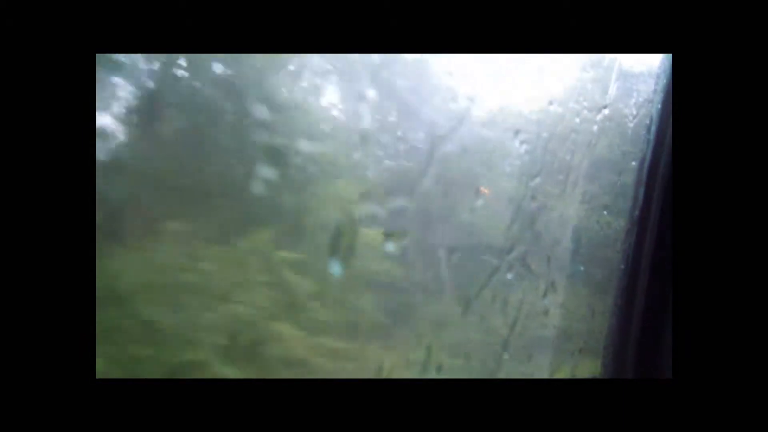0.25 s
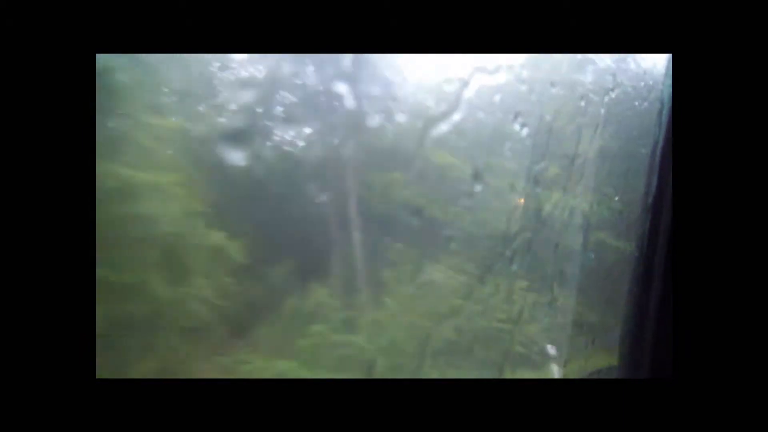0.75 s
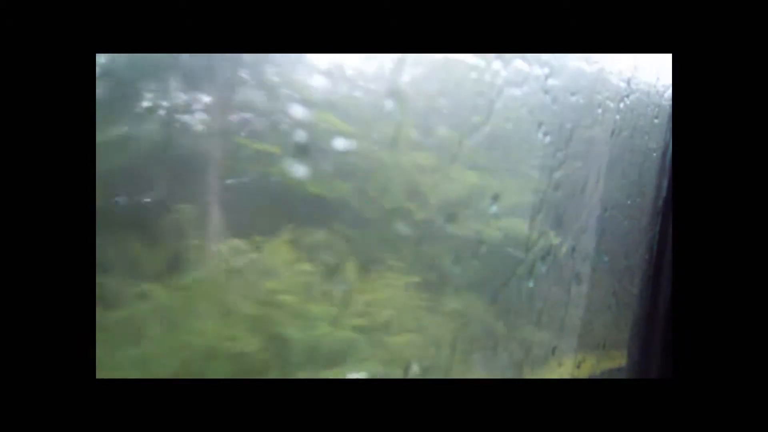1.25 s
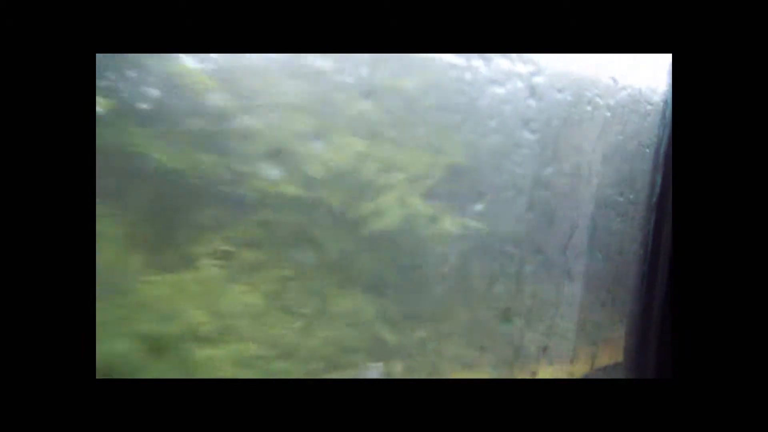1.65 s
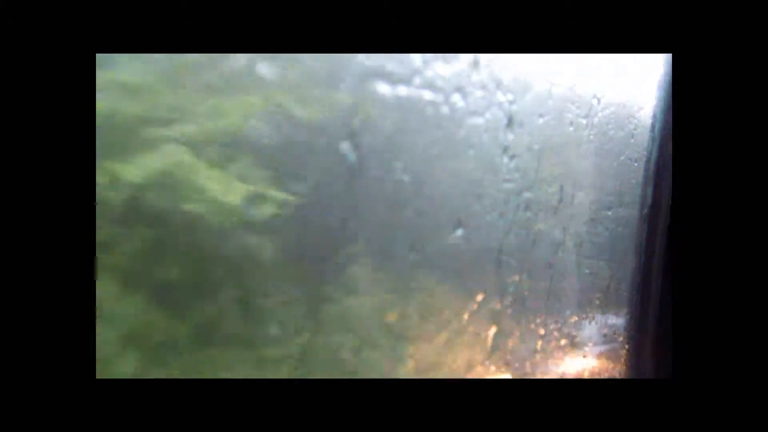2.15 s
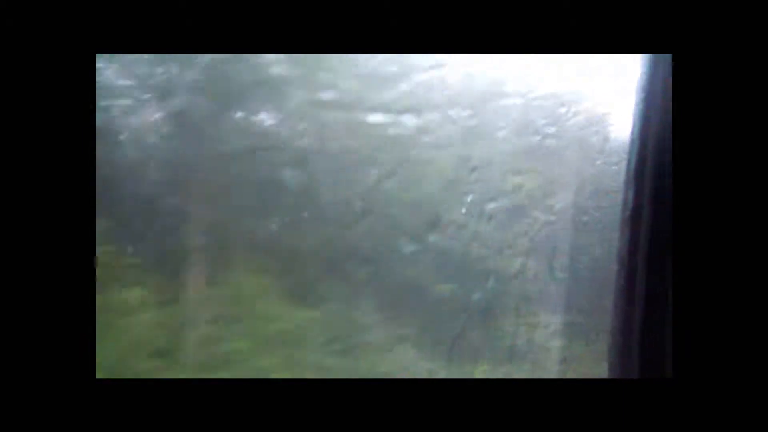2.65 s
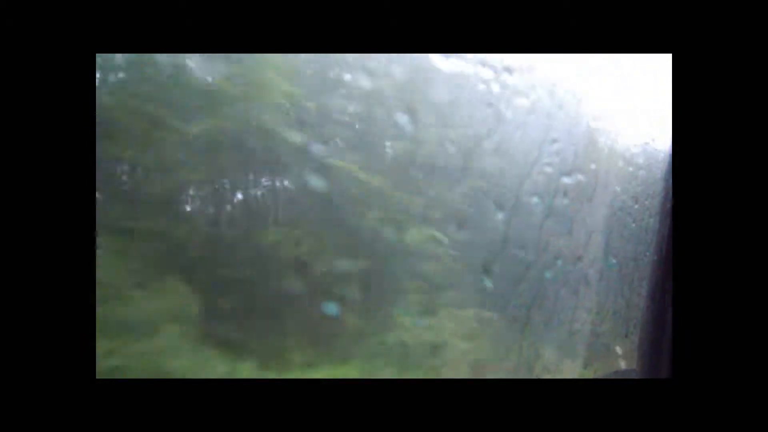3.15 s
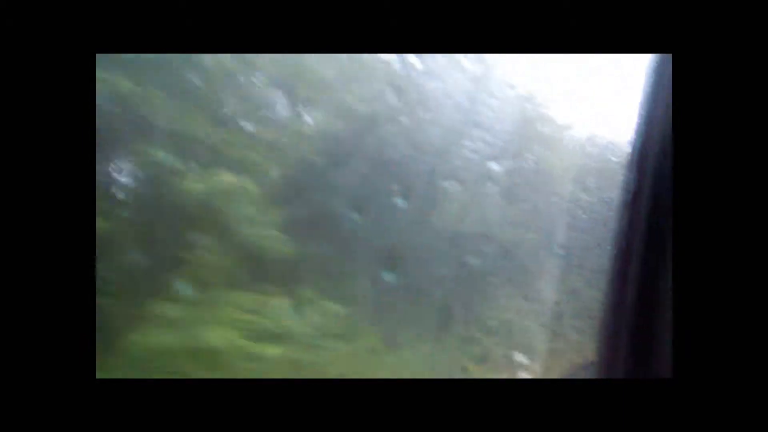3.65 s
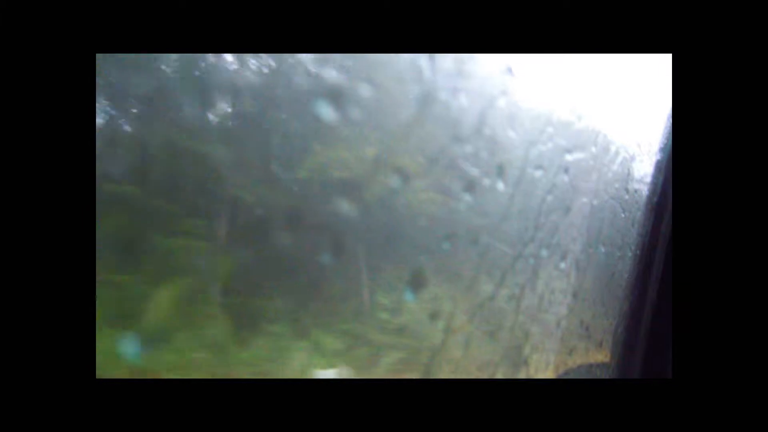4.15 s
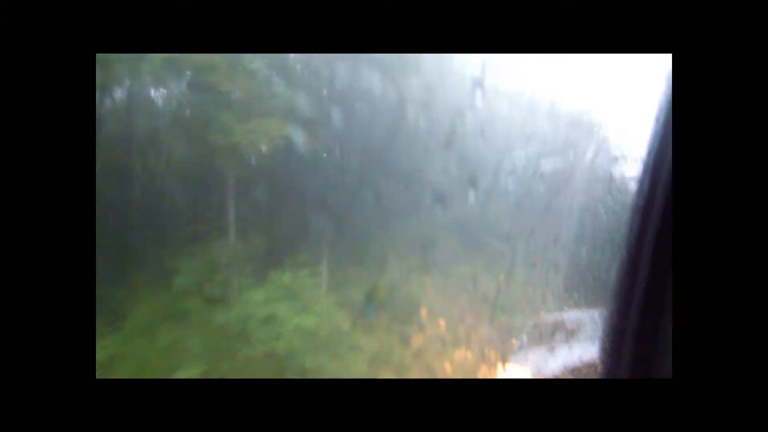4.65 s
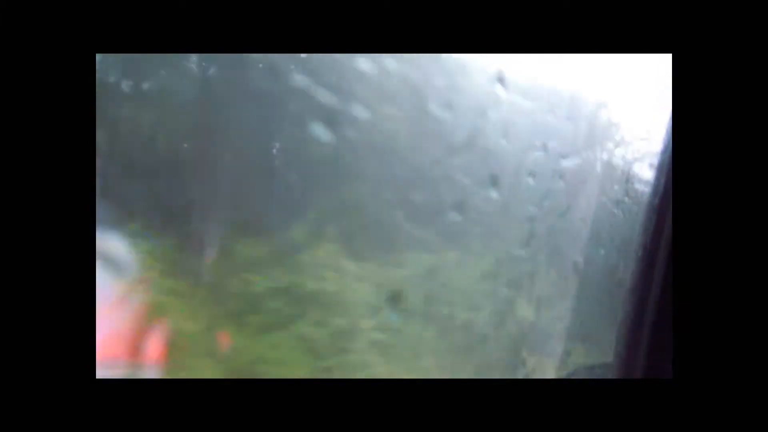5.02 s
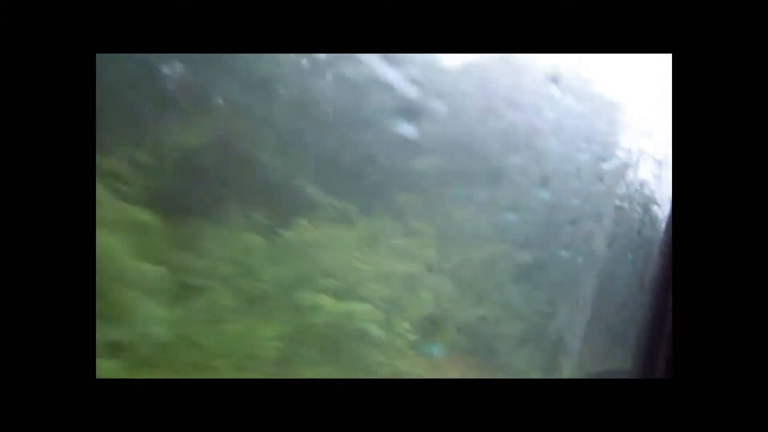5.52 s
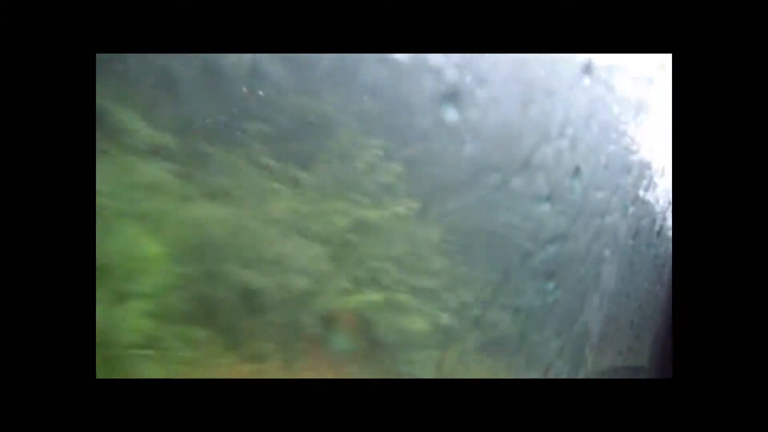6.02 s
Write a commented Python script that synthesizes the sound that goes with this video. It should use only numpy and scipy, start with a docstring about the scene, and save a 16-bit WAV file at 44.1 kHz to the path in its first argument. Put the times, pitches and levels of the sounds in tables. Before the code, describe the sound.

Rain patters and fat drops smack the glass of a driving car, while the engine drones and tyres rumble on wet road.

```python
"""Inside a car, driving through a forest in heavy rain.
The engine booms at its firing rate and the drivetrain whines faintly. The body shakes over bumps;
the tyres rumble, roar and hiss on the wet road and wash through puddles.
Rain patters on glass and roof in gusts, and fat drops from the trees smack in between."""
import sys
import numpy as np
from scipy import signal
from scipy.fft import rfft, irfft
from scipy.io import wavfile

SR = 44100
rng = np.random.default_rng(int(sys.argv[2]) if len(sys.argv) > 2 else 0)


def generate_wav(signal):
    """Clip the signal to [-1, 1] and save it as 16-bit WAV at the path in sys.argv[1]."""
    frames = np.transpose(np.atleast_2d(signal))
    scaled = np.clip(frames, -1, 1) * 32767
    pcm = np.round(scaled).astype(np.int16)
    wavfile.write(sys.argv[1], SR, pcm)


N = 276948
TIME = np.arange(N) / SR
CABIN_T60_S = .04


def from_db(db):
    """Decibels to gain."""
    return 10 ** (np.asarray(db) / 20)


def unit_rms(x):
    """Scale to rms 1."""
    return x / np.sqrt(np.mean(x ** 2) + 1e-20)


def curves(rows):
    """One linearly interpolated curve per column after t."""
    times, *columns = np.transpose(rows)
    return [np.interp(TIME, times, column) for column in columns]


def swell(at_s, half_s):
    """Gaussian of height 1, down to 1/e at +-half_s."""
    return np.exp(-((TIME - at_s) / half_s) ** 2)


def drift(rate_hz):
    """Slow random wander, rms 1."""
    hop, settle = 40, 2000
    pole = np.exp(-2 * np.pi * rate_hz * hop / SR)
    noise = rng.standard_normal(N // hop + settle + 2)
    slow = signal.lfilter([1], [1, -2 * pole, pole ** 2], noise)[settle:]
    return np.interp(np.arange(N) / hop, np.arange(len(slow)), unit_rms(slow))


def coloured(x, spectrum):
    """Minimum-phase filter, falling 24 dB/oct past the spectrum's ends; output rms 1."""
    hz, db = np.transpose(spectrum)
    size = 2 ** 15
    bin_oct = np.log2(np.maximum(np.arange(size // 2 + 1) * SR / size, 1))
    knot_oct = np.log2(hz)
    outside_oct = np.abs(bin_oct - np.clip(bin_oct, knot_oct[0], knot_oct[-1]))
    shape_db = np.interp(bin_oct, knot_oct, db) - 24 * outside_oct
    cepstrum = irfft(np.log(from_db(shape_db)))[:size // 2]
    cepstrum[0] /= 2
    impulse = irfft(np.exp(rfft(2 * cepstrum, size)))
    return unit_rms(signal.fftconvolve(x, impulse)[:N])


def band(x, hz, width_oct, order=1):
    """Butterworth band-pass centred on hz."""
    edges_hz = np.clip(hz * 2 ** (np.array([-.5, .5]) * max(width_oct, .1)), [100, 200], [15000, 19000])
    return signal.sosfilt(signal.butter(order, edges_hz, "band", fs=SR, output="sos"), x + 1e-18)


def noise_band(hz, width_oct):
    """Band of noise, rms 1."""
    return unit_rms(band(rng.standard_normal(N), hz, width_oct, order=2))


# firing rate: t/s, f/Hz
FIRING_RATE = [(0, 69.1), (.6, 67.7), (1, 67.1), (1.6, 67.03), (2.6, 67.45), (3.6, 67.7), (4.6, 68.1),
               (5.1, 68.5), (6.28, 68.75)]
# engine load: t/s, order 1 level/dB, order 2 level/dB
ENGINE_LOAD = [(0.0, -33.5, -37.5), (0.45, -29.0, -33), (0.79, -29.5, -36), (0.92, -23.5, -33.5),
               (1.6, -23, -31.0), (2.1, -27, -33), (2.8, -25.5, -32.5), (4.0, -26.5, -31),
               (4.6, -24.0, -30.0), (5.2, -29, -34), (6.28, -26.5, -34)]
# weak orders: multiple of firing rate, level/dB re order 2
WEAK_ORDERS = [(2.5, -20), (3.5, -19.5), (4, -25.5), (5, -26.5)]
# third-order drone: t/s, level/dB
DRONE_LEVEL = [(0.0, -47.5), (0.75, -40), (1.5, -47), (2.6, -50.5), (6.28, -53)]
# drivetrain whine: t/s, level/dB
WHINE_LEVEL = [(0.0, -47.5), (0.49, -41), (0.98, -46.5), (2.6, -48.5), (4.45, -45.5), (5.04, -50),
               (5.4, -48), (6.28, -62)]


def engine():
    """Firing pulses reach the cabin as a boom and higher orders; the drivetrain whine turns with them."""
    firing_hz, = curves(FIRING_RATE)
    boom_db, octave_db = curves(ENGINE_LOAD)
    drone_db, = curves(DRONE_LEVEL)
    whine_db, = curves(WHINE_LEVEL)
    phase = 2 * np.pi * np.cumsum(firing_hz) / SR

    def tone(order, db, waver):
        """One order, unsteady in amplitude and phase."""
        amplitude = np.sqrt(2) * from_db(db) * (1 + waver * drift(8.3))
        return amplitude * np.cos(order * phase + waver * drift(2.3))

    boom = tone(1, boom_db, waver=.1) + tone(2, octave_db, waver=.17)
    overtones = sum(tone(order, octave_db + db, waver=.24) for order, db in WEAK_ORDERS)
    drone = tone(3, drone_db, waver=.33)
    whine = tone(6, whine_db, waver=.18)
    return boom + overtones + drone + whine


# road bumps: t/s, peak level/dB, half-width/s
ROAD_BUMPS = [(0.62, -24.5, .07), (2.806, -24, 0.22), (3.64, -24, 0.044), (4.505, -26, 0.14),
              (4.882, -18.5, 0.15), (6.05, -20.5, .13)]
# body shake: f/Hz, relative level/dB
SHAKE_SPECTRUM = [(8, 4.5), (14, -11), (20, 1), (30, -0.5), (42, -15.5), (55, -7), (80, -23.5)]


def body_shake(floor_db=-28.5):
    """The body rocks on its springs, harder over bumps."""
    bump_power = sum((from_db(db) * swell(at_s, half_s)) ** 2 for at_s, db, half_s in ROAD_BUMPS)
    return np.sqrt(from_db(floor_db) ** 2 + bump_power) * coloured(rng.standard_normal(N), SHAKE_SPECTRUM)


# road surface: t/s, rumble level/dB, hiss level/dB, roar level/dB
ROAD_SURFACE = [(0.0, -34.5, -46.5, -78), (0.6, -32.5, -43.5, -72), (1.45, -32, -42.5, -59),
                (1.8, -32.5, -43.5, -46.5), (2.25, -35.5, -45.5, -44), (3.0, -34, -45, -47),
                (3.35, -33, -43.5, -44.5), (3.85, -33, -43.5, -44), (4.6, -31, -40, -41.3),
                (5.1, -35.5, -45, -48), (5.6, -36, -43.5, -50.5), (5.92, -33, -41, -44),
                (6.28, -33, -41.5, -46)]
# tyre rumble: f/Hz, relative level/dB
RUMBLE_SPECTRUM = [(35, -16), (60, 4), (92, 7), (120, 1), (185, 0), (240, -2.5), (315, -6), (375, -5.5),
                   (470, -13), (620, -17), (1000, -30)]
# wet hiss: f/Hz, relative level/dB
HISS_SPECTRUM = [(350, -8), (520, -6.5), (640, 1), (760, -3), (900, -3.5), (1040, -5.5), (1140, -1.5),
                 (1260, -7), (1420, -6), (1600, -16.5), (2000, -17.5), (3000, -19)]


def tyres():
    """The tread drums on asphalt, squeezes out water and roars in one broad resonance."""
    rumble_db, hiss_db, roar_db = curves(ROAD_SURFACE)
    rumble = from_db(rumble_db) * coloured(rng.standard_normal(N), RUMBLE_SPECTRUM)
    hiss = from_db(hiss_db + 1.3 * drift(3.3)) * coloured(rng.standard_normal(N), HISS_SPECTRUM)
    roar = from_db(roar_db) * noise_band(hz=772, width_oct=.4)
    return rumble + hiss + roar


# oncoming cars: t/s, peak level/dB, half-width/s
ONCOMING_CARS = [(2.803, -51.5, 0.19), (4.96, -49, 0.27)]
# puddles: t/s, peak level/dB, half-width/s
PUDDLE_CROSSINGS = [(5.905, -48.5, 0.11), (6.153, -45, 0.056)]


def road_water():
    """Water sizzles thinly as oncoming cars pass; the wheels wash through puddles."""
    passing = sum(from_db(db) * swell(at_s, half_s) for at_s, db, half_s in ONCOMING_CARS)
    wading = sum(from_db(db) * swell(at_s, half_s) for at_s, db, half_s in PUDDLE_CROSSINGS)
    return passing * noise_band(hz=4400, width_oct=.24) + wading * noise_band(hz=1690, width_oct=.73)


def impacts(per_s, cap_db, low_hz, high_hz, width_oct, spots=12):
    """Drops land at random, many small, few large; each spot rings briefly in its own band."""
    size_db = np.minimum(3 * rng.exponential(1, N), cap_db)
    clicks = from_db(size_db) * rng.choice([-1, 1], N) * (rng.random(N) < per_s / SR)
    spot = rng.integers(0, spots, N)
    spot_hz = np.geomspace(low_hz, high_hz, spots)
    return unit_rms(sum(band(clicks * (spot == k), hz, width_oct) for k, hz in enumerate(spot_hz)))


def cabin_scatter(x, tail_db):
    """Glass and trim scatter each impact into a short diffuse tail."""
    pole = from_db(-60 / (CABIN_T60_S * SR)) ** 2
    energy = signal.lfilter([1 - pole], [1, -pole], x ** 2 + 1e-18)
    return x + from_db(tail_db) * np.sqrt(energy) * rng.standard_normal(N)


# rain strength before trim: t/s, patter level/dB, spray level/dB
RAIN_STRENGTH = [(0.0, -45.5, -45), (0.12, -42.5, -43.5), (0.75, -44.5, -45), (0.88, -44.5, -44.5),
                 (0.97, -44, -44.5), (1.6, -41.5, -42), (2.22, -49.5, -51.5), (2.42, -47.5, -47.5),
                 (2.95, -47.5, -46.5), (3.25, -46.5, -46), (3.8, -44.5, -45), (4.55, -44.5, -46.5),
                 (5.15, -45.5, -48), (5.55, -45.5, -47.5), (5.85, -41.5, -42.5), (6.28, -43, -50)]
# water shaken from trees: t/s, spray rise/dB, half-width/s
TREE_SHOWERS = [(0.11, 3, 0.043), (0.965, 7.5, 0.025), (1.102, 6.5, 0.047), (1.305, 2, 0.018),
                (1.512, 4.5, 0.025), (2.05, 4.5, 0.053), (2.443, 2.5, 0.082), (3.03, 4.5, 0.011),
                (3.32, 2.5, 0.015), (3.988, 3, 0.05), (4.246, 5, 0.035), (4.5, 5.5, 0.026),
                (4.634, 4, 0.074), (5.738, 4.5, 0.031)]
# patter: f/Hz, relative level/dB
PATTER_SPECTRUM = [(600, -4.5), (1200, -3.5), (1720, 0.5), (2050, -2), (2600, 1), (2880, 1.5), (3250, 2.5),
                   (4300, 0.5), (5500, -3), (7500, -5), (10500, -38)]
# fine spray: f/Hz, relative level/dB
SPRAY_SPECTRUM = [(3000, -16), (5000, -5), (6500, -3), (8000, -1), (9300, -1.5), (10200, -6), (11000, -9.5)]


def rain(patter_trim_db=1.48, spray_trim_db=1.33):
    """Drops patter on the panes, spray ticks on the windscreen, in flurries over a wash of droplets."""
    patter_db, spray_db = curves(RAIN_STRENGTH)
    showers_db = sum(db * swell(at_s, half_s) for at_s, db, half_s in TREE_SHOWERS)
    surge_db = showers_db + drift(4)
    flurry = drift(35)
    drops = impacts(1500 * from_db(3.6 * flurry), cap_db=15, low_hz=935, high_hz=7000, width_oct=1.5)
    ticks = impacts(1600 * from_db(4.4 * flurry), cap_db=17, low_hz=4500, high_hz=9850, width_oct=.48)
    drops = cabin_scatter(drops, tail_db=-2)
    ticks = cabin_scatter(ticks, tail_db=-3)
    patter = coloured(drops + from_db(1) * rng.standard_normal(N), PATTER_SPECTRUM)
    spray = coloured(ticks + from_db(-3) * rng.standard_normal(N), SPRAY_SPECTRUM)
    patter *= from_db(patter_db + .46 * surge_db + patter_trim_db)  # showers are mostly spray
    spray *= from_db(spray_db + surge_db + spray_trim_db)
    return patter + spray


def stray_drops(per_s=9, count=120, width_oct=.94, splash_s=.0034):
    """Middling drops at random, harder in heavier rain; rows as in FAT_DROPS."""
    times = np.cumsum(rng.gamma(2, .5, count)) / per_s
    size, pitch = rng.standard_normal((2, count))
    _, spray_db = curves(RAIN_STRENGTH)
    swing_db = np.interp(times, TIME, spray_db - spray_db.mean())
    levels_db = -37 + .9 * size + .33 * swing_db
    pings_hz = 6600 * 2 ** (.41 * pitch)
    return [(at_s, db, hz, width_oct, splash_s)
            for at_s, db, hz in zip(times, levels_db, pings_hz) if at_s < TIME[-1]]


# fat drops from trees: t/s, level/dB before trim, ping f/Hz, ping width/oct, splash decay/s
FAT_DROPS = [(0.113, -35, 4400, 1.1, .004), (0.2312, -32.5, 3680, 1, 0.0021),
             (0.32, -30.5, 4500, 1.6, 0.002), (0.369, -32, 4300, 1.6, 0.0016),
             (0.4649, -33.5, 3600, 1.1, 0.0025), (0.5078, -38, 7500, 1, .0016),
             (0.5402, -24.5, 5000, 1.7, 0.0021), (0.5645, -27, 6300, 1.9, 0.0049),
             (0.6469, -36, 8000, 0.74, .0016), (0.667, -29, 5500, 2.4, 0.0045),
             (0.706, -27, 7400, 1.7, 0.0075), (0.7982, -29.5, 7000, 1, 0.0019),
             (0.8188, -25, 3920, 1, 0.003), (0.967, -31, 7000, 1.5, .0044),
             (1.0698, -27.5, 3800, 2.3, 0.005), (1.2071, -29.5, 8100, .66, .0016),
             (1.29, -29.5, 6950, 1.5, .003), (1.464, -27.5, 8550, 0.41, 0.003),
             (1.631, -31.5, 4220, 1.7, .0016), (1.6436, -29.5, 4970, 1.6, 0.007),
             (2.6325, -30, 4500, 1.2, 0.0015), (2.7957, -32.5, 6100, 0.64, 0.0036),
             (3.6052, -32, 7100, .7, .0017), (3.6676, -40, 7000, 0.64, .0016),
             (4.0877, -31, 1400, 1.8, .004), (4.2412, -32, 6300, 2.1, .0016),
             (5.071, -32.5, 4470, 0.49, 0.0016), (5.3034, -31, 3600, .3, .0026),
             (5.4298, -31, 6900, 2.1, .0016), (5.438, -33.5, 4370, .35, .0017),
             (5.9798, -30.5, 4950, 0.38, .0017), (6.0961, -30.5, 3030, .22, .003),
             (6.2005, -29, 7700, .37, 0.0016)]


def drop_smacks(rows, trim_db):
    """A drop smacks the glass: sharp crack, a ping as long as the splash, faint cabin tail."""
    tail_db, crack_db, crack_s, spread_s = -14, -10, .0012, .0005
    out, t = np.zeros(N + SR), TIME[:SR // 25]
    attack = 1 - np.exp(-t / spread_s)  # the drop flattens
    for at_s, db, hz, width_oct, splash_s in rows:
        noise = rng.standard_normal(len(t)) * attack
        decay = np.exp(-t / splash_s) + from_db(tail_db - 60 * t / CABIN_T60_S)
        ping = unit_rms(band(noise * decay, hz, width_oct, order=2))
        crack = unit_rms(band(noise * np.exp(-t / crack_s), hz=5700, width_oct=2.3, order=2))
        start = int(at_s * SR)
        out[start:start + len(t)] += from_db(db + trim_db) * unit_rms(ping + from_db(crack_db) * crack)
    return out[:N]


def scene():
    """Mono mix at a window seat."""
    car = engine() + body_shake() + tyres() + road_water()
    weather = rain() + drop_smacks(list(FAT_DROPS) + stray_drops(), trim_db=-10.5)
    return (car + weather)[None]


def record(dry):
    """Steep low-pass at 10.6 kHz."""
    lowpass = signal.firwin(181, 10600, window=("kaiser", 8), fs=SR)
    return signal.fftconvolve(dry, lowpass[None], "same")


dry = scene()
out = record(dry)
generate_wav(out)
```